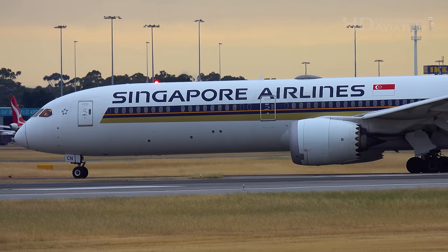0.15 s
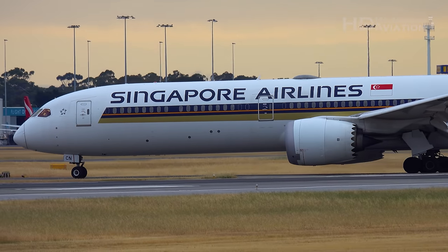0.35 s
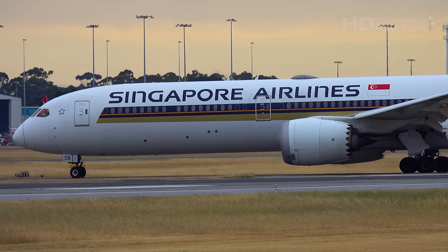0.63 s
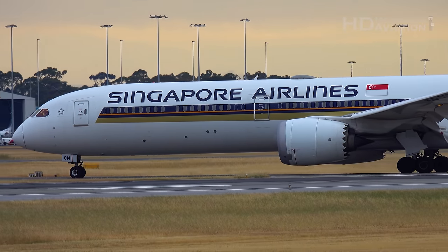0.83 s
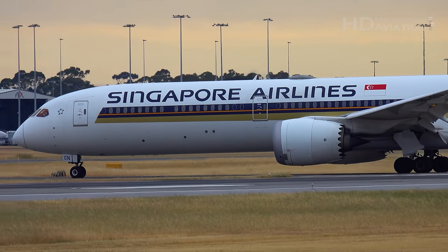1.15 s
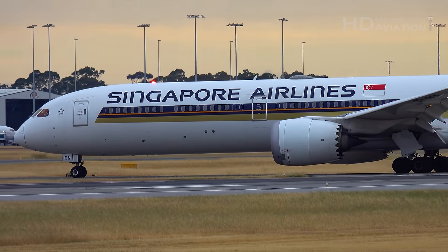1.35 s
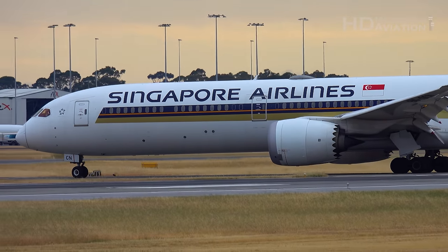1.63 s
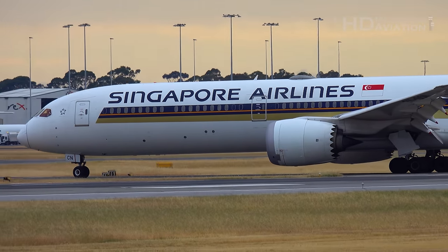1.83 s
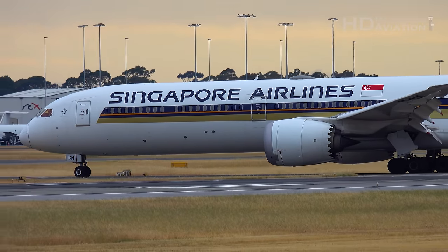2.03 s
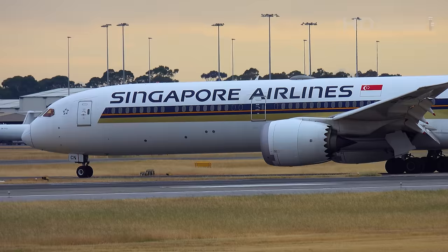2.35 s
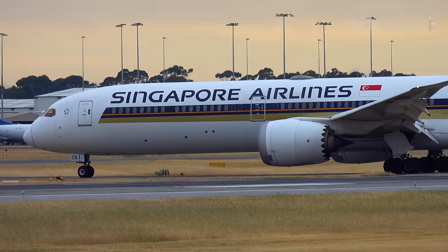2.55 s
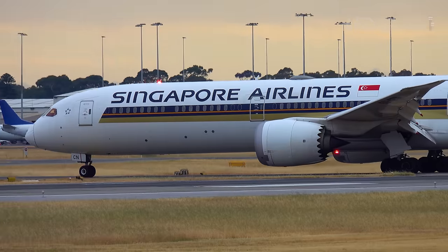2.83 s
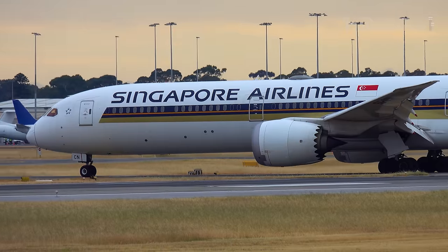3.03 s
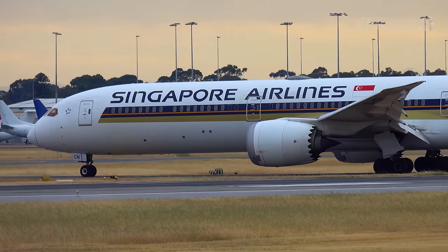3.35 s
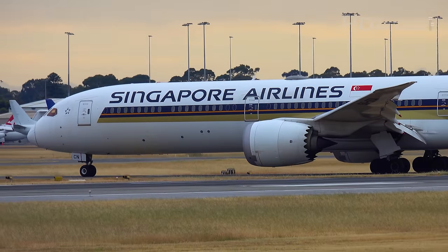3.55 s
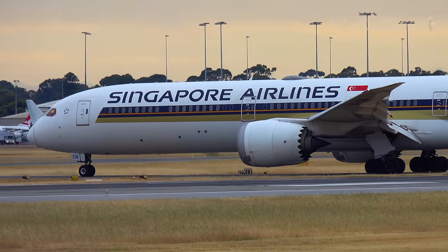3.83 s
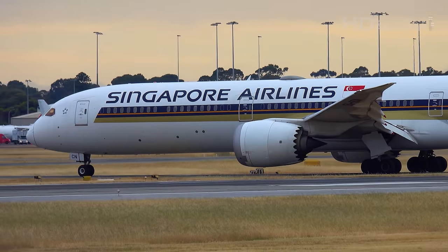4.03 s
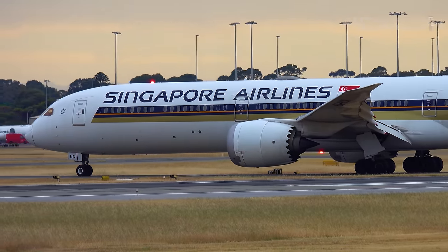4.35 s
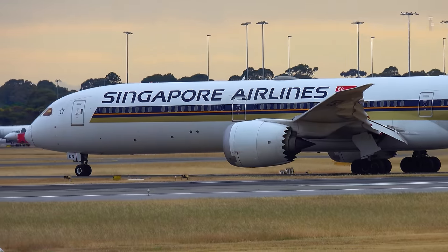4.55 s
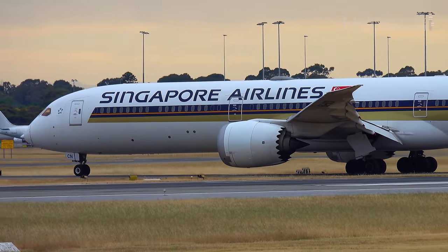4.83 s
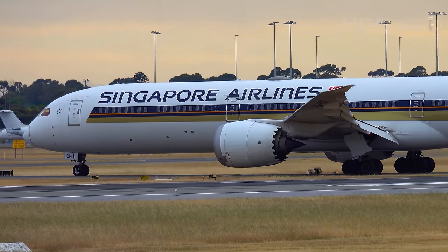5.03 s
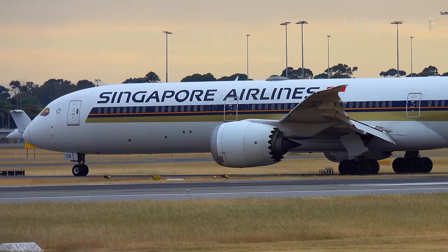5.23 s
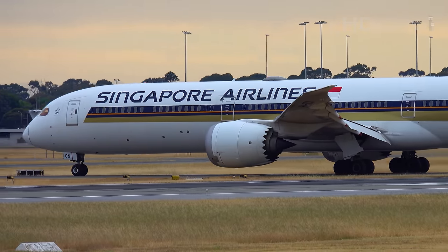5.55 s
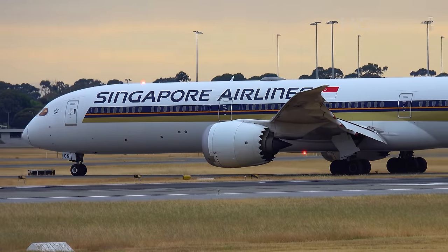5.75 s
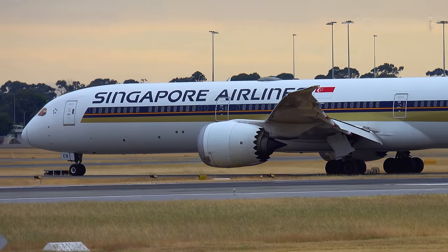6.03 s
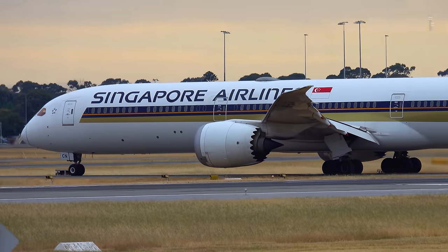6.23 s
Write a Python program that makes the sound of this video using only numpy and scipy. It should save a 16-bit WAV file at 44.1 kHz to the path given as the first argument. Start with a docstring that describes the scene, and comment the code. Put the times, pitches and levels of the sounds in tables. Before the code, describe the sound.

A large jet taxis past in the distance with a deep rumble and broad fan roar while small birds chirp and twitter nearby.

```python
"""A deep exhaust rumble and a broad fan roar run throughout: a large twin jet taxis past, far across grass.
The jet is shaped noise, its high end lost on the way; unsteady air makes the roar come and go in patches.
Small birds chirp, twitter, warble and rattle nearer by, as sine tones of gliding, shaken pitch.
Short echoes from the surroundings follow each call, and faint microphone hiss lies under everything."""
import sys
import numpy as np
from scipy import signal
from scipy.fft import rfft, irfft
from scipy.io import wavfile
from scipy.ndimage import uniform_filter1d, map_coordinates

SR = 44100
rng = np.random.default_rng(int(sys.argv[2]) if len(sys.argv) > 2 else 0)


def unload_audio(sound):
    """Save the sound as a 16-bit wav file, at the path given as the first command line argument."""
    columns = np.transpose(np.atleast_2d(sound))
    # keep every value between -1 and 1, then stretch to whole-number steps
    steps = np.round(np.clip(columns, -1, 1) * 32767)
    wavfile.write(sys.argv[1], SR, steps.astype(np.int16))


N = 281799
TIME = np.arange(N) / SR
HZ = np.fft.rfftfreq(N, 1 / SR)

# plain whistles, mostly of birds farther off; the row at 1.205 s is a high second voice of the nearest bird's
# dive: (time [s], length [s], first pitch [Hz], last pitch [Hz], level [dB])
WHISTLES = [(0.0, .07, 6150, 6250, -87), (0.04, 0.055, 3875, 3775, -70.5), (0.25, .026, 4700, 5600, -93),
            (0.676, 0.077, 3770, 3750, -83), (0.9, 0.098, 4170, 4030, -86), (1.01, .026, 4750, 5400, -86),
            (1.043, .11, 4200, 4150, -84.5), (1.205, .03, 7620, 7450, -83), (1.45, 0.17, 2540, 2540, -76),
            (2.667, 0.057, 2780, 2900, -72.5), (3.673, 0.018, 4400, 4120, -79),
            (3.771, .023, 4860, 3200, -78), (4.079, 0.093, 3530, 3470, -75.5),
            (4.612, .065, 3100, 3290, -77), (4.689, 0.04, 3420, 3500, -76), (5.14, .05, 4600, 4700, -87),
            (5.173, 0.073, 3400, 3380, -79), (5.663, .065, 3700, 3780, -81)]
# dry rattling calls: (time [s], ticks [count], tick rate [1/s], middle pitch [Hz], level [dB])
RATTLES = [(4.310, 3, 88, 4000, -76), (4.853, 4, 34, 5200, -84), (4.863, 7, 70, 3470, -72.5),
           (4.867, 7, 66, 4300, -84), (5.136, 7, 40, 5250, -81.5)]
# one phrase of a twittering bird, each time it comes: (time [s], level [dB])
TWITTERS = [(2.481, -75), (2.642, -73), (2.812, -72), (3.012, -75)]
# the three falling notes of that phrase:
# (delay [s], length [s], first pitch [Hz], middle pitch [Hz], last pitch [Hz], level re phrase [dB])
PHRASE = [(0, .032, 5120, 4660, 4550, -9), (0.028, 0.028, 3860, 3180, 3280, 5),
          (0.066, .030, 5230, 4450, 4350, -2.5)]
# rising two-voiced chips, about two a second: (time [s], low voice level [dB], high voice level [dB])
CHIPS = [(0.340, -76, -92), (0.915, -75, -91), (1.410, -75, -89), (1.968, -74.5, -92), (2.472, -72, -92),
         (2.868, -72, -86), (3.273, -72, -87), (3.750, -72.5, -89), (4.238, -71, -95), (4.745, -70, -90),
         (5.190, -70, -89), (6.258, -72.5, -96)]
# hoarse calls that sweep up and down again:
# (time [s], length [s], top pitch [Hz], level before the throat resonance [dB])
SWEEPS = [(0.591, 0.059, 7740, -86), (4.383, 0.031, 6430, -98.5), (5.23, 0.042, 7650, -88)]
# nearest bird, a held note that dives and flicks back up:
# (time [s], length [s], first pitch [Hz], held pitch [Hz], lowest pitch [Hz],
#  place of the held pitch [0-1 of length], mid-note level [dB], swell over the note [dB],
#  flick level re note [dB])
DIVES = [(1.198, 0.06, 6200, 6200, 4850, 0.43, -72, 23, -1),
         (2.47, 0.066, 6750, 6420, 4730, 0.6, -72, 26, -10),
         (3.288, .064, 5560, 7100, 5200, 0.37, -73, 1, -15),
         (3.842, .055, 6000, 6190, 5310, 0.47, -68, 27, 0),
         (5.323, 0.054, 5950, 6220, 5120, .6, -65, 16, 0)]
# narrow bands in the engine noise:
# (centre [Hz], half width at half amplitude [Hz], peak level [dB], loudest at [s], spread in time [s])
DRONES = [(66.4, 24, -47.5, 5.7, 6.6), (149.5, 3.2, -57.5, 3.8, 2.5), (293.7, 18, -60, 1.2, 1),
          (418, 33, -62.5, 3, 5.1), (784, 14, -64, 3.4, 0.24), (817, 29, -58, 1.05, 0.65),
          (859, 17, -68.5, 1.3, 1.4), (1086, 90, -61, 0.17, 0.31), (631, 69, -59, 5.4, 0.89),
          (1377, 2.4, -70.5, 4.2, 0.67)]
# spectral shape of the fan roar: (frequency [Hz], relative level [dB])
ROAR_SHAPE = [(120, -17.5), (200, -1), (290, 2.5), (360, -1), (440, 1.5), (530, -2), (820, 0.5), (1000, -2),
              (1250, -7), (1750, -11.5), (2300, -20.5), (3000, -24), (3550, -28.5), (4000, -36.5),
              (4900, -45), (7000, -56)]
# turning colour of the roar in three bands; only departures from each mean count, scaled by sway:
# (time [s], level [dB])
DRONE_COURSE = [(0, -51.5), (0.8, -56), (1.4, -52.8), (4.0, -51.5), (5.2, -57.5), (6.39, -56)]
ROAR_COURSE = [(0, -57.5), (0.9, -54.5), (1.8, -57), (3.5, -56.5), (6.39, -56)]
RUSH_COURSE = [(0, -53), (0.4, -51.5), (1.8, -58), (2.6, -55.5), (4.6, -55.8), (6.39, -53.5)]
# spectral shape of the exhaust, before its swells are evened: (frequency [Hz], relative level [dB])
RUMBLE_SHAPE = [(10, -30), (20, -20.5), (27, -9.5), (36, -11), (50, -2.5), (65, -1), (82, -7), (115, -7),
                (135, -12.5), (190, -16.5), (260, -23.5), (360, -39.5), (1500, -80.5)]
# course of the exhaust rumble as the jet passes: (time [s], level [dB])
RUMBLE_LEVEL = [(0, -43), (3.3, -43.5), (4.0, -41.5), (4.8, -44), (5.4, -41.5), (6.39, -43)]


def gain_of(db):
    """Level law: amplitude grows tenfold for every 20 dB."""
    return 10 ** (np.asarray(db) / 20)


def evened(x):
    """Power normalization: scales a signal to an rms of 1."""
    return x / np.sqrt(np.mean(x ** 2) + 1e-30)


def read(points, hz):
    """Spectral interpolation: straight lines over log frequency."""
    f, value = np.transpose(points)
    return np.interp(np.log(hz + 1), np.log(f + 1), value)


def add(mix, s, sound):
    """Superposition: adds a sound to the mix in place from time s."""
    part = mix[max(round(s * SR), 0):][:len(sound)]
    part += sound[:len(part)]


def noise(gain):
    """Spectral shaping: white noise weighted by an amplitude spectrum, at rms 1."""
    white = rfft(rng.standard_normal(N))
    return evened(irfft(white * gain, N))


def waver(size, rate_hz):
    """Band-limited random modulation: a smooth curve through random knots of about unit rms."""
    knots = rng.standard_normal(2048)
    return map_coordinates(knots, [np.arange(size) * rate_hz / SR + 4], order=3, mode="wrap")


def surroundings(x, near_db=-4, near_t60=0.18, far_db=-16, far_t60=0.8, delay=.005):
    """Exponential decay of reverberation: strong quick scatter close by, a fainter longer tail far off."""
    t = np.arange(SR // 2) / SR
    echo = np.zeros(len(t))
    for db, t60 in ((near_db, near_t60), (far_db, far_t60)):
        signs = rng.choice([-1., 1.], len(t))
        taps = signs * (rng.random(len(t)) < 2000 / SR)  # about 2000 reflections per second
        tail = taps * np.exp(-np.log(1000) * t / t60) * (t > delay)
        echo += gain_of(db) * tail / np.linalg.norm(tail)
    return signal.fftconvolve(x, echo)[:N]


def note(length, first_hz, top_hz, last_hz, place, db, swell_db, rasp, rise=1.0, fall=3.0,
         wobble=0.0076, jitter=0.066, shimmer_db=0.1):
    """Frequency modulation: a whistle bends through its middle pitch; a fast pitch shake makes it rasp."""
    u = np.linspace(0, 1, max(int(length * SR), 64))
    place = np.clip(place, .05, .98)
    before = np.maximum(1 - u / place, 0)
    after = np.maximum((u - place) / (1 - place), 0)
    hz = top_hz + (first_hz - top_hz) * before ** rise + (last_hz - top_hz) * after ** fall
    shake = jitter * np.clip(rasp, 0, 1) * waver(len(u), rate_hz=870)
    hz = hz * (1 + wobble * waver(len(u), rate_hz=330) + shake)
    loudness = gain_of(db + swell_db * (u - .5) + shimmer_db * waver(len(u), rate_hz=130))
    envelope = np.sqrt(2) * loudness * signal.windows.tukey(len(u), .3)  # sqrt(2): sine of rms 1
    return envelope * np.sin(2 * np.pi * np.cumsum(hz) / SR)


def whistles(fade_db=-2, rasp=.1):
    """Linear glide: each pitch slides to its last value and stays there."""
    for s, length, first_hz, last_hz, db in WHISTLES:
        yield s, db, note(length, first_hz, last_hz, last_hz, 0.77, db, fade_db, rasp)


def warble(start_s=3.24, step_s=.116, note_s=0.0565, low_hz=2780, level_db=-71, count=7, slur=.12,
           droop=0.081, spread=0.046, climb=0.0063, loose_s=.025, uneven_db=2, rasp=0.23):
    """Random variation about a trend: loosely paced arched slurs, tending upward in pitch."""
    for k, (late, sharp, long, skew, loud) in enumerate(rng.uniform(-1, 1, (count, 5))):
        hz = low_hz * (1 + climb * k + spread * sharp)
        db = level_db + uneven_db * loud
        length, place = note_s * (1 + 0.46 * long), .6 + .25 * skew
        sound = note(length, hz * (1 - slur), hz, hz * (1 - droop), place, db, 0, rasp)
        yield start_s + k * step_s + loose_s * late, db, sound


def rattles(tick_s=0.0073, bend=0.16, rasp=0.64):
    """Pulse train: very short falling ticks at a regular rate."""
    for s, count, per_s, hz, db in RATTLES:
        for k in range(round(count)):
            tick = note(tick_s, hz * (1 + bend), hz, hz * (1 - bend), 0.42, db, 0, rasp)
            yield s + k / per_s, db, tick


def twitters(place=0.49, rasp=.07):
    """Periodic motif: the same three quick pitch glides, over and over."""
    for s, db in TWITTERS:
        for delay, length, *pitches, step_db in PHRASE:
            level_db = db + step_db
            yield s + delay, level_db, note(length, *pitches, place, level_db, 0, rasp)


def chips(length=0.028, low_from_hz=3050, low_to_hz=3760, high_from_hz=4850, high_to_hz=6500,
          lead_s=.012, swell_db=4, rasp=.04):
    """Two independent oscillators: both sides of the syrinx slide upward, the high one a little ahead."""
    for s, low_db, high_db in CHIPS:
        low = note(length, low_from_hz, low_to_hz, low_to_hz, 0.75, low_db, swell_db, rasp)
        yield s, low_db, low
        high = note(length, high_from_hz, high_to_hz, high_to_hz, 0.91, high_db, swell_db, rasp, rise=0.87)
        yield s - lead_s, high_db, high


def sweeps(foot_hz=5050, roundness=1.3, rasp=0.54, throat_hz=5850, throat_q=9, throat_db=14,
           echo_s=0.071, echo_db=4.0, echo_fade_db=-10):
    """Resonance: a hoarse pitch arch flares as it crosses the throat's peak; a rough echo trails after it."""
    throat = signal.iirpeak(throat_hz, throat_q, SR)
    for s, length, top_hz, db in SWEEPS:
        arch = note(length, foot_hz, top_hz, foot_hz, 0.68, db, 0, rasp, roundness, roundness)
        yield s, db, arch + gain_of(throat_db) * signal.lfilter(*throat, arch)
        echo = note(echo_s, throat_hz, throat_hz, throat_hz, .5, db + echo_db, echo_fade_db, 1)
        yield s + 0.69 * length, db, echo


def dives(rise=2.2, fall=2.8, flick_s=0.021, flick_lead_s=0.0086, flick_rise=0.14,
          flick_fade_db=-4, rasp=0.15):
    """Joint frequency and amplitude modulation: a held note swells, dives, and flicks back up."""
    for s, length, first_hz, held_hz, low_hz, place, db, swell_db, flick_db in DIVES:
        yield s, db, note(length, first_hz, held_hz, low_hz, place, db, swell_db, rasp, rise, fall)
        turn_hz = low_hz * 1.04
        end_hz = turn_hz * (1 + flick_rise)
        flick = note(flick_s, turn_hz, turn_hz, end_hz, 0.4, db + flick_db, flick_fade_db, rasp)
        yield s + length - flick_lead_s, db, flick


def birds(close_db=-65, wetter=0.083):
    """Direct-to-reverberant ratio: fainter birds are farther off and echo more."""
    direct, scattered = np.zeros((2, N))
    for calls in (whistles, warble, rattles, twitters, chips, sweeps, dives):
        for s, db, sound in calls():
            add(direct, s, sound)
            add(scattered, s, sound * gain_of(wetter * (close_db - db)))
    return direct + surroundings(scattered)


def drones():
    """Narrow-band resonance and directivity: fuzzy engine tones, each heard best from one angle."""
    out = np.zeros(N)
    for hz, width, db, s, span in DRONES:
        passing = np.exp(-.5 * ((TIME - s) / span) ** 2)
        resonance = 1 / (1 + ((HZ - hz) / width) ** 4)
        out += gain_of(db) * passing * noise(resonance)
    return out


def fans(level_db=-50.0, drone_hz=290, roar_hz=580, rush_hz=1100, hiss_hz=2100, patchy_db=1.0,
         flutter_db=0.4, sway=1.2, hiss_share=.2, hiss_fade_db_per_s=0.18):
    """Directivity and turbulence: roar turns colour as the engines pass; moving air makes it patchy."""
    frames, hz = N // 256 + 5, np.fft.rfftfreq(1024, 1 / SR)
    t = np.arange(frames) * 256 / SR
    courses = (DRONE_COURSE, ROAR_COURSE, RUSH_COURSE)
    drone, middle, rush = (np.interp(t, *np.transpose(course)) for course in courses)
    hiss = hiss_share * rush - hiss_fade_db_per_s * t  # follows the rush, and fades as the intakes turn away
    drift = np.transpose([band - band.mean() for band in (drone, middle, rush, hiss)])
    # how far each band's drift reaches across the spectrum
    centres = (drone_hz, roar_hz, rush_hz, hiss_hz)
    reach = np.array([read(list(zip(centres, row)), hz) for row in np.eye(drift.shape[1])])
    a, b, patches = rng.standard_normal((3, frames, len(hz)))
    patches = uniform_filter1d(patches, size=30, axis=0)  # smooth over time
    patches = evened(uniform_filter1d(patches, size=4, axis=1))  # and over frequency
    flutter = evened(uniform_filter1d(rng.standard_normal(frames), size=12))[:, None]
    field_db = read(ROAR_SHAPE, hz) + sway * drift @ reach + patchy_db * patches + flutter_db * flutter
    spectrum = (a + 1j * b) * gain_of(field_db)
    roar = signal.istft(spectrum.T, nperseg=1024, noverlap=768)[1][:N]
    return gain_of(level_db) * evened(roar)


def exhaust(evenness=0.39):
    """Turbulent mixing noise: big slow eddies of the exhaust, their swells kept within bounds."""
    eddies = noise(gain_of(read(RUMBLE_SHAPE, HZ)))
    swell = np.sqrt(abs(uniform_filter1d(eddies ** 2, size=7000)) + 1e-9)  # running rms
    rumble = evened(eddies / swell ** evenness)
    return rumble * gain_of(np.interp(TIME, *np.transpose(RUMBLE_LEVEL)))


def scene():
    """Superposition: the near birds and the far jet add linearly, in one channel."""
    return (birds() + drones() + fans() + exhaust())[None]


def record(dry, hiss_db=-89, edge_hz=12000):
    """Noise floor and band limit: faint microphone hiss, then a low-pass filter over everything."""
    hissy = dry + gain_of(hiss_db) * rng.standard_normal(dry.shape)
    low_pass = signal.firwin(511, edge_hz, window=("kaiser", 9), fs=SR)
    return signal.oaconvolve(hissy, low_pass[None], "same")


dry = scene()
out = record(dry)
unload_audio(out)
```